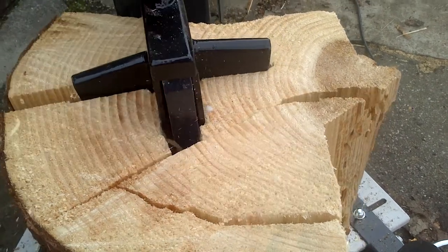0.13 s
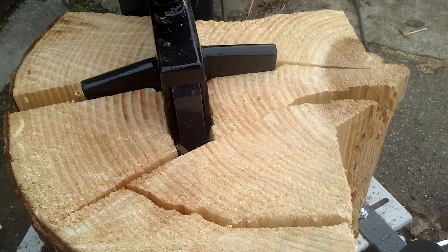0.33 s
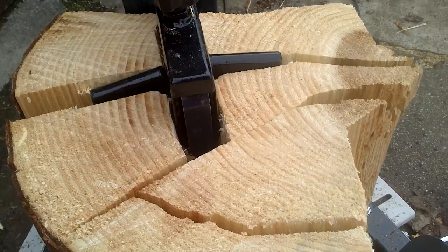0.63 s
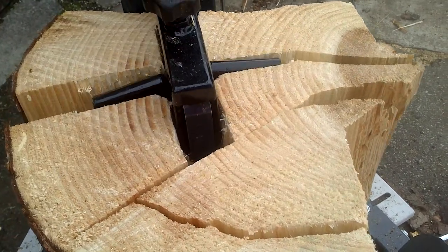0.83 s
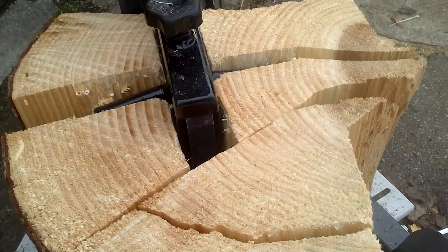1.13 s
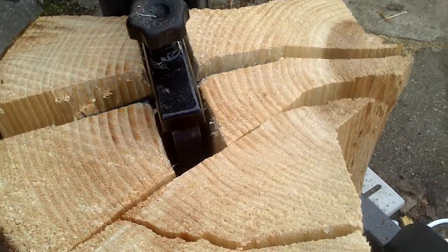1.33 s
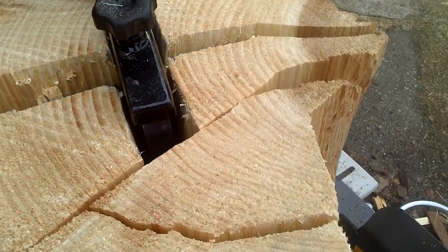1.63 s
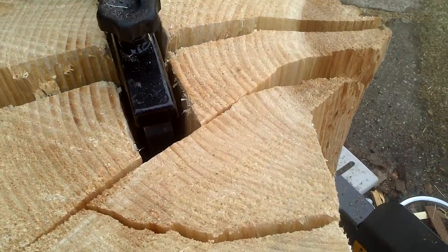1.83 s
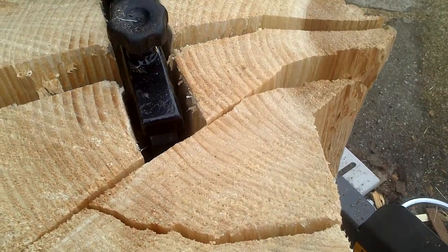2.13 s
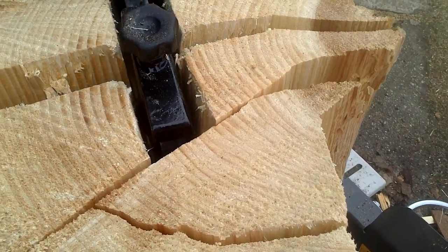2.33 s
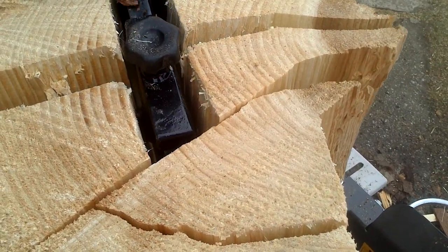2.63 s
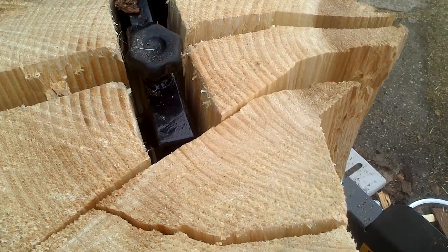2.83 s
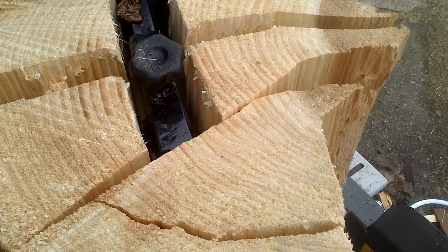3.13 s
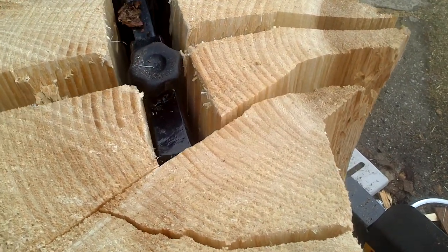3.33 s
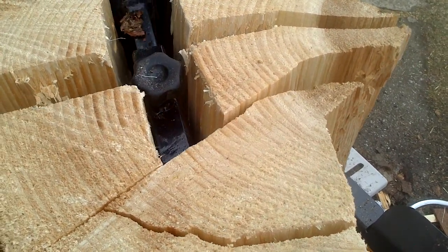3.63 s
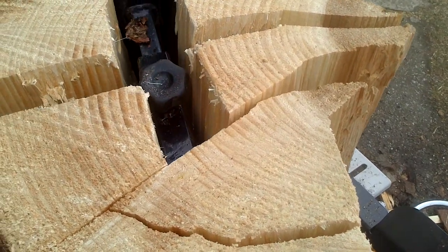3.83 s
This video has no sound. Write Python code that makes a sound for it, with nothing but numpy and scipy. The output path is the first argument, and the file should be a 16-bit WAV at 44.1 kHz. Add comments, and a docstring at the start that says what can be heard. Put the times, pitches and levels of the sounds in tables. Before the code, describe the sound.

Wood tearing and snapping, dense at first then sparse, above the constant hum of a hydraulic pump.

```python
"""A gear pump whines on a hydraulic log splitter outdoors: sines on multiples of its motor's shaft speed.
Shaped noise makes the fan and oil rush and low wind; dense small impulses make the crackle of tearing fibres.
Larger cracks ring the modes of the log around a short splinter tone, with noise for thump, tick and rustle.
Two decaying sines are the steel beam humming on. Only the left channel carries the scene."""
import sys
import numpy as np
from scipy import signal
from scipy.io import wavfile
from scipy.ndimage import uniform_filter1d

SR = 44100
rng = np.random.default_rng(int(sys.argv[2]) if len(sys.argv) > 2 else 0)


def wav_record(signal):
    """Record a signal, one row per channel, as 16-bit PCM in the file named by sys.argv[1]."""
    frames = np.transpose(np.atleast_2d(signal))
    bounded = np.clip(frames, -1, 1)
    # unit amplitude maps onto the largest positive 16-bit level
    quanta = np.round(bounded * 32767).astype(np.int16)
    wavfile.write(sys.argv[1], SR, quanta)


N = 176400  # 4 s

# Source levels are in the mix, before scene() doubles it; IDLE_DB and OFFSET are added after that.
# Motor shaft speed: (time [s], speed [turns/s])
SHAFT_SPEED = [(0, 49.6), (.9, 49.62), (1.1, 49.685), (1.9, 49.685), (3.1, 49.63), (3.6, 49.72),
               (4, 49.725)]
# Audible multiples of the shaft speed: (order [cycles/turn])
WHINE_ORDERS = [10,12,18,20,22,23,30,40,42,48,49,50,51,52,53,54,55,58,59,60,61,62,72,168,178,180,182,188]
# Base rms of each of those multiples, to which the pump load adds: (level [dB])
WHINE_LEVELS = [-58,-77,-74,-63,-78,-74,-77,-75,-78,-75,-74,-66,-79,-68,-69,-69,-75,-66,-74,-74,-72,-79,-76,-94,-92,-93,-94,-93]
# Pump load, added to the base levels:
# (time [s], tooth tone [dB], its octave [dB], whine up to UPPER_ORDER [dB], whine above it [dB])
PUMP_LOAD = [(0, 9, -15, 0, 11.5), (.3, 6.5, 2, -2, 6.5), (.5, 2.5, 5, 2.5, 3.5), (.8, 1, 1, 3, 0.5),
             (.95, 9.5, 1, 0, -1.5), (1.28, 10, -8, -0.5, -3), (1.47, -6, -0.5, -0.5, -1.5),
             (1.7, -6.5, -7, -0.5, 1.5), (1.9, -2.5, 2.5, 0.5, -0.5), (2.2, 1.5, -5.5, 0.5, 1),
             (2.55, 5.5, 2, 0, 0), (3.0, 5, -5, 0.5, 0), (3.33, 6, -2, 0.5, -1), (3.5, -5, 0.5, -1.5, -2.5),
             (4, -5.5, 0, -0.5, -3)]
# Spectral shape of the machine rush: (frequency [Hz], relative density [dB per Hz])
RUSH_SHAPE = [(25, 5), (60, -17.5), (150, -10.5), (300, -8), (500, -2), (750, -1), (900, -9.5),
              (1500, -8.5), (2100, -12), (3000, -14.5), (4000, -26), (5500, -38.5), (9000, -35),
              (11000, -41), (12000, -58)]
# Crackle of tearing fibres: (time [s], level of the ringing part [dB])
CRACKLE_LEVEL = [(0, -34), (.12, -43.5), (.2, -41.5), (.27, -53), (.43, -50), (.52, -45), (.62, -46),
                 (.72, -64), (.78, -60.5), (1.2, -61.5), (1.4, -77), (3.0, -72.5), (3.3, -79), (3.42, -86),
                 (3.55, -77.5)]
# Modes of the log: (frequency [Hz], level [dB], 60 dB decay time [s])
LOG_MODES = [(414, 1, 0.15), (470.3, -3, 0.16), (596, 4.5, 0.13), (722, 3, 0.085), (948, 0.5, 0.07),
             (1061, 3.5, 0.057), (1346, 14.5, 0.018), (1569, 3, 0.065), (1854, 2, 0.064),
             (2226, 8.5, 0.028), (2637, 11, 0.023), (3290, 4.5, 0.035), (3720, -0.5, 0.034),
             (4700, -39, 0.038)]
# Single cracks; thump and tick are relative to the crack level:
# (time [s], level [dB], centre [Hz], bass thump peak [dB], treble tick peak [dB])
CRACKS = [(0.001, -23.5, 1720, -11, -16.5), (0.019, -30, 1980, -30, -1.5), (0.038, -38.5, 620, -2.5, -4),
          (0.072, -47, 737, -26, 6), (0.086, -30.5, 1860, -18, -5), (0.102, -43, 649, -10, 2),
          (0.126, -29, 2120, -25, -10), (0.1377, -12, 3090, -26, -16), (0.1405, -12.5, 1275, -10, -13),
          (0.153, -14.5, 748, -17, -18.5), (0.174, -20.5, 470, -11.5, -21.5), (0.2178, -23, 1980, -15, -41),
          (0.225, -27.5, 2520, -31, -28), (0.29, -34.5, 600, -15, -10.5), (0.342, -32.5, 2080, -35, -15.5),
          (0.356, -33.5, 670, -16, -16), (0.412, -38.5, 1010, -32, -13), (0.416, -40.5, 2460, -36, 1.5),
          (0.426, -33, 2230, -32, -12), (0.435, -33, 1060, -35, -11), (0.46, -40, 3150, -11, -8),
          (0.504, -37, 2160, -25, -4), (0.515, -28.5, 2080, -40, -11.5), (0.556, -17.5, 2180, -32, -22),
          (0.572, -34, 2000, -30, -14), (0.608, -33, 2510, -32, -12), (0.648, -33.5, 580, -37, -5),
          (0.6791, -16, 2610, -40, -16), (0.699, -30.5, 1780, -30, -35), (0.714, -40, 2550, -24, -34),
          (0.812, -33, 2350, -46, -13), (0.83, -31.5, 690, -29, -12), (0.863, -46, 1030, -27, 1),
          (0.9181, -20, 2424, -33, -45), (0.936, -41.5, 2370, -22, -19), (1.074, -40, 1240, -27, -3.5),
          (1.1, -41.5, 636, -31, -7), (1.139, -35, 1900, -21.5, -16), (1.209, -41.5, 1370, -36, -8),
          (1.57, -38, 4830, -20, -2.5), (1.662, -31.5, 634, -32, -19), (1.863, -47, 590, -32, 6.5),
          (1.889, -43, 1050, -26, -7.5), (2.101, -43, 1890, -35, -17), (2.756, -44, 3160, -43, -3),
          (2.7688, -20, 1083, -32, -8), (2.83, -29.5, 1070, -40, -16), (3.059, -36, 540, -7.5, -36),
          (3.065, -26, 1280, -18.5, -28), (3.169, -34, 1170, -4.5, -48), (3.286, -45, 650, 3.5, -38),
          (3.29, -31, 974, -8, -46), (3.346, -37.5, 1700, -1.5, 4), (3.35, -29.5, 2850, -21, -4),
          (3.356, -25.5, 1450, -7, -18), (3.3593, -21, 510, -10, -25), (3.3684, -21, 666, -13.5, -41),
          (3.574, -32.5, 1120, -38, -16), (3.954, -29.5, 980, -21, -41)]
# Modes of the steel beam: (frequency [Hz], level [dB], 60 dB decay time [s])
BEAM_MODES = [(187, -49.5, 2.65), (581, -48.5, 2)]

# Pump: teeth per turn, the order that divides the whine, phase step [turns per order squared]
TEETH, UPPER_ORDER, WHINE_TWIST = 10, 56, 0.2
WAVER_HZ, WAVER_DB = 2.145, 1.5
SIZZLE_ORDERS, SIZZLE_DB, SIZZLE_SPREAD_DB = range(158, 206), -100, 2.5

# Rush and wind
RUSH_DB, PATCH_DB = -59.5, 1.5
GUST_DB, GUST_SWING_DB, GUST_HZ = -74, 3, 67.6

# Crackle: puff and shake levels are relative to the ringing part
FIBRES_PER_S, FIBRE_SPREAD_DB = 1500, 4.5
CLUMP_DB, CLUMP_HZ = 4.5, 39.97
FIBRE_RING = 0.24  # share of the log's decay time
PUFF_DB, PUFF_T60, SHAKE_DB = -8.5, 0.0057, -23

# Log body in each crack; DETUNE is a fraction of the mode frequency
DETUNE, MODE_SPREAD_DB = 0.073, 2
LOBE_DB, ABOVE_DB = -3, -3.5  # per octave from the centre; extra per octave above it
ECHO_SNAP, TEAR_S, SOFT_S = 0.52, 0.003, 0.0005  # largest later snap, window and onset time constant [s]
BODY_FROM_HZ, BODY_DB = 240, -6

# Other parts of each crack; decay times in s, levels relative to the crack
RISE_S, SPLINTER_T60, SPLINTER_DB = 0.00056, 0.017, -6.5
THUMP_FROM_HZ, THUMP_TO_HZ, THUMP_T60 = 60, 290, 0.1
TICK_FROM_HZ, TICK_TO_HZ, TICK_T60 = 2540, 7330, 0.0088
RUSTLE_DB, RUSTLE_T60, RAGGED_DB = -16, 0.098, 1.5

BEAM_S = 0.2  # onset of the hum

# Recording inputs
IDLE_DB, OFFSET, EDGE_HZ = -100, -1.4e-4, 16000


def gain_of(db):
    """Decibels to amplitude."""
    return 10 ** (np.asarray(db) / 20)


def evened(x):
    """Scale to rms 1."""
    return x / np.sqrt(np.mean(x ** 2) + 1e-20)


def curve(rows, column=1):
    """Draw one table column as a line over the whole scene."""
    rows = np.array(rows)
    return np.interp(np.arange(N) / SR, rows[:, 0], rows[:, column])


def add(mix, s, sound):
    """Lay a sound into the mix at s seconds."""
    part = mix[max(round(s * SR), 0):][:len(sound)]
    part += sound[:len(part)]


def drift(hz):
    """Slow random wandering up to hz, rms 1, from eight sines."""
    t = np.arange(0, N + 256, 256)
    slow = sum(np.sin(2 * np.pi * (f * t / SR + rng.random())) / np.sqrt(f)
               for f in np.geomspace(hz / 8, hz, num=8))
    return np.interp(np.arange(N), t, evened(slow))


def band(x, lo_hz, hi_hz, order=2):
    """Butterworth band-pass."""
    sos = signal.butter(N=order, Wn=[lo_hz, hi_hz], btype="band", fs=SR, output="sos")
    return signal.sosfilt(sos, x)


def fade(t60, t):
    """Exponential decay by 60 dB in t60 seconds."""
    return gain_of(-60 * t / t60)


def ring(hz, db, t60, t):
    """One struck mode: a decaying sine."""
    return gain_of(db) * fade(t60, t) * np.sin(2 * np.pi * hz * t)


def pump():
    """Shaft-locked sines: tooth tone and octave follow the load, staggered phases make the whine a fine buzz."""
    turns = np.cumsum(curve(SHAFT_SPEED)) / SR
    out = np.zeros(N)
    tooth_levels = {TEETH: curve(PUMP_LOAD, column=1), 2 * TEETH: curve(PUMP_LOAD, column=2)}
    lower, upper = curve(PUMP_LOAD, column=3), curve(PUMP_LOAD, column=4)
    for k, db in zip(WHINE_ORDERS, WHINE_LEVELS):
        if k in tooth_levels:
            level = tooth_levels[k]
        else:
            level = (upper if k > UPPER_ORDER else lower) + WAVER_DB * drift(WAVER_HZ)
        tone = np.cos(2 * np.pi * k * (turns + WHINE_TWIST * k))
        out += gain_of(db + level) * np.sqrt(2) * tone
    # faint high sizzle on every order, with random levels and phases
    for k in SIZZLE_ORDERS:
        level = SIZZLE_DB + SIZZLE_SPREAD_DB * rng.standard_normal()
        out += gain_of(level) * np.cos(2 * np.pi * (k * turns + rng.random()))
    return out


def machine_rush():
    """Fan and oil rush: noise shaped in frequency, with soft patches of level across time and pitch."""
    frames, hz = N // 256 + 5, np.fft.rfftfreq(1024, 1 / SR)
    real, imag, patches = rng.standard_normal((frames, 513, 3)).T
    patches = uniform_filter1d(patches, 10, axis=0)
    patches = evened(uniform_filter1d(patches, 10, axis=1))
    shape_hz, shape_db = np.transpose(RUSH_SHAPE)
    shape = np.interp(np.log(hz + 1), np.log(shape_hz), shape_db)[:, None]
    spectrum = (real + 1j * imag) * gain_of(shape + PATCH_DB * patches)
    rush = signal.istft(spectrum, nperseg=1024, noverlap=768)[1][:N]
    return gain_of(RUSH_DB) * evened(rush)


def wind():
    """Low wind lumps: bass noise whose level wanders."""
    rumble = evened(band(rng.standard_normal(N), 20, GUST_HZ))
    return rumble * gain_of(GUST_DB + GUST_SWING_DB * drift(4.54))


def crackle():
    """Fibres break at random in clumps, each a dry puff and a short log mode; low noise shakes the frame along."""
    breaks = rng.random(N) < FIBRES_PER_S / SR
    size = breaks * gain_of(FIBRE_SPREAD_DB * np.minimum(rng.exponential(1, N), 4))
    size = size * gain_of(CLUMP_DB * drift(CLUMP_HZ))
    which, t = rng.integers(0, len(LOG_MODES), N), np.arange(4000) / SR
    body = np.zeros(N)
    for k, (hz, db, t60) in enumerate(LOG_MODES):
        body += signal.oaconvolve(size * (which == k), ring(hz, db, FIBRE_RING * t60, t))[:N]
    body = evened(band(body, BODY_FROM_HZ, 3700))
    puffs = signal.oaconvolve(size, fade(PUFF_T60, t))[:N] * rng.standard_normal(N)
    puffs = gain_of(PUFF_DB) * evened(band(puffs, 420, 3580))
    shake = gain_of(SHAKE_DB) * evened(band(rng.standard_normal(N), 25, 69))
    return gain_of(curve(CRACKLE_LEVEL)) * (body + puffs + shake)


def log_body(centre_hz, t):
    """Quick random snaps excite the log modes, which weaken with distance from the crack's centre."""
    snaps = np.zeros(len(t))
    when, strength = rng.random((2, 4))
    snaps[(when * TEAR_S * SR).astype(int)] = ECHO_SNAP * (2 * strength - 1)
    snaps[0] = 1
    modes = np.zeros(len(t))
    for hz, db, t60 in LOG_MODES:
        pitch, size = rng.uniform(-1, 1, 2)
        octaves = np.log2(hz / centre_hz)
        level = db + LOBE_DB * abs(octaves) + ABOVE_DB * max(octaves, 0) + MODE_SPREAD_DB * size
        modes += ring(hz * (1 + DETUNE * pitch), level, t60, t)
    modes *= 1 - np.exp(-t / SOFT_S)
    return band(signal.fftconvolve(snaps, modes)[:len(t)], BODY_FROM_HZ, 5500)


def crack(crack_db, centre_hz, thump_db, tick_db):
    """A splinter sings briefly over the ringing log, with noise for thump, tick and ragged rustle."""
    t = np.arange(int(0.25 * SR)) / SR
    thump, tick, rustle, rough = rng.standard_normal((4, len(t)))
    rise = (1 - np.exp(-t / RISE_S)) ** 2
    ragged = gain_of(RAGGED_DB * evened(uniform_filter1d(rough, size=90)))
    rustle = rustle * ragged * fade(RUSTLE_T60, t)
    parts = [
        (BODY_DB, log_body(centre_hz, t)),
        (SPLINTER_DB, rise * ring(centre_hz, 0, SPLINTER_T60, t)),
        (thump_db, band(thump * fade(THUMP_T60, t), THUMP_FROM_HZ, THUMP_TO_HZ)),
        (tick_db, band(tick * rise * fade(TICK_T60, t), TICK_FROM_HZ, TICK_TO_HZ)),
        (RUSTLE_DB, band(rustle, centre_hz / 1.9, centre_hz + 1500))]
    return sum(gain_of(crack_db + db) * part / abs(part).max() for db, part in parts)


def beam():
    """The struck steel beam hums on as two slowly decaying modes."""
    t = np.arange(2 * SR) / SR
    return sum(ring(*mode, t) for mode in BEAM_MODES)


def scene():
    """Mix all sources, double the level and leave the right channel silent."""
    mix = pump() + machine_rush() + wind() + crackle()
    for s, *settings in CRACKS:
        add(mix, s, crack(*settings))
    add(mix, BEAM_S, beam())
    return np.array([2 * mix, np.zeros(N)])


def record(dry):
    """Both inputs add faint low circuit noise and a small offset, all that the open right one gives; treble is cut."""
    idle = gain_of(IDLE_DB) * evened(band(rng.standard_normal((2, N)), 4.4, 64, order=1))
    low_pass = signal.firwin(511, EDGE_HZ, window=("kaiser", 9), fs=SR)
    return signal.oaconvolve(dry + idle, low_pass[None], "same") + OFFSET


dry = scene()
out = record(dry)
wav_record(out)
```